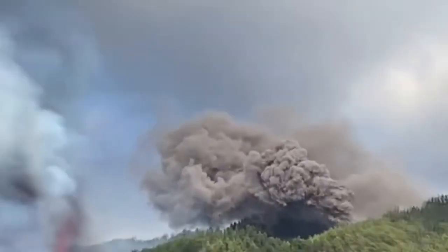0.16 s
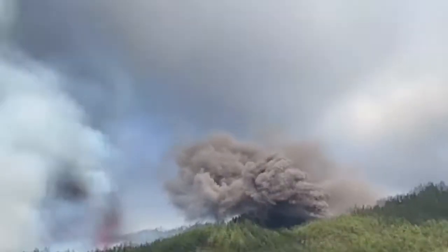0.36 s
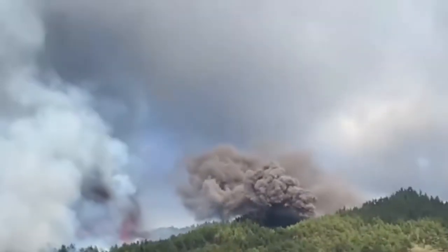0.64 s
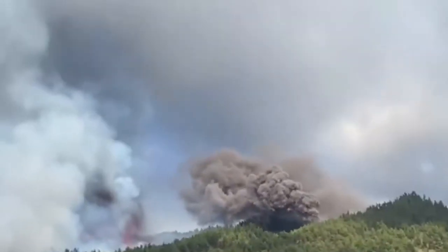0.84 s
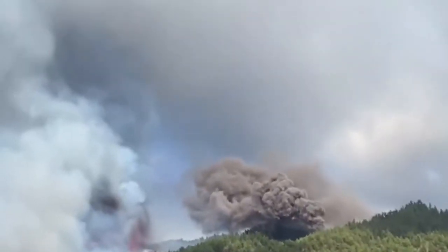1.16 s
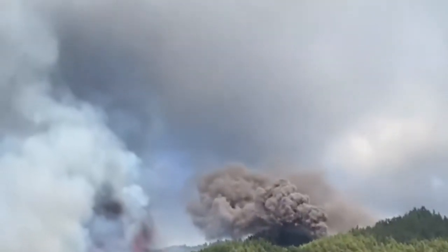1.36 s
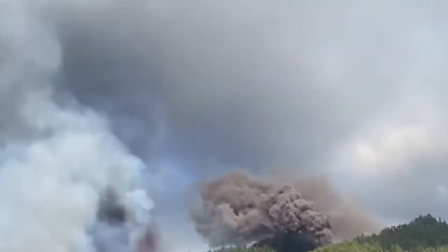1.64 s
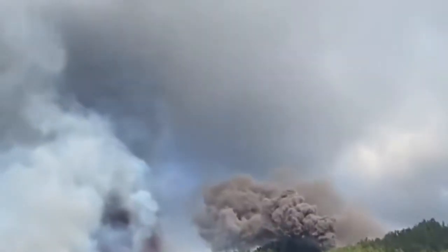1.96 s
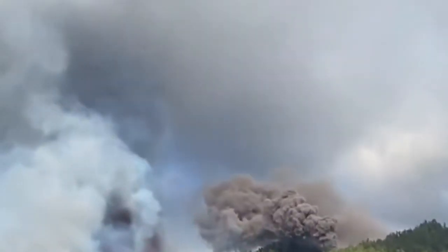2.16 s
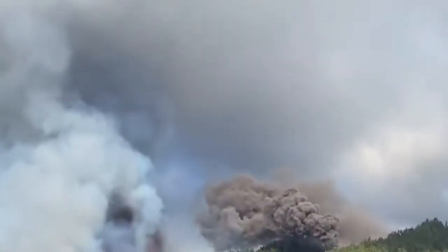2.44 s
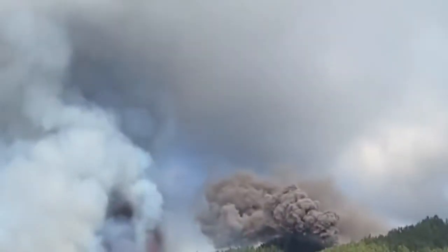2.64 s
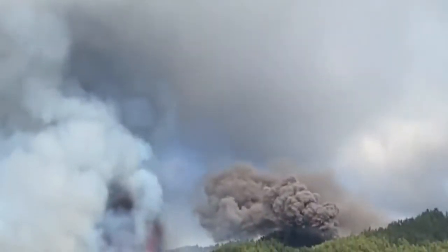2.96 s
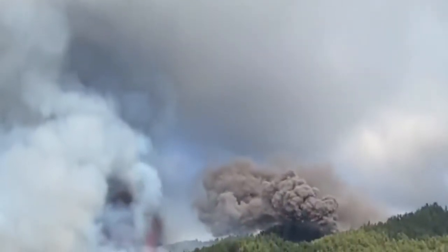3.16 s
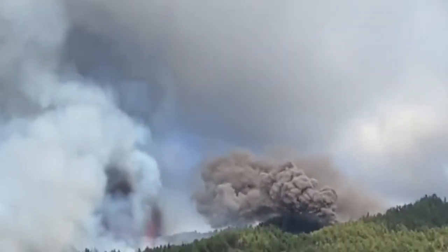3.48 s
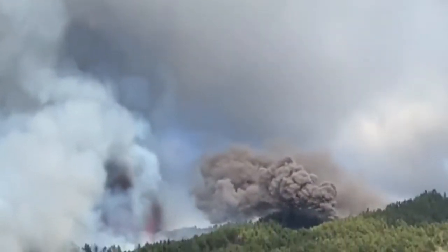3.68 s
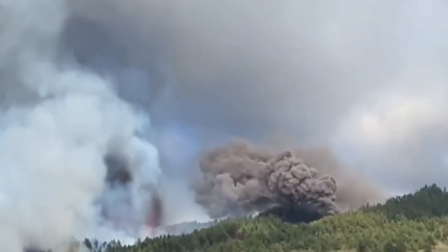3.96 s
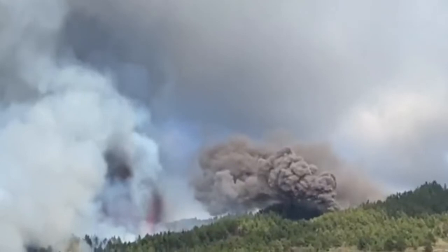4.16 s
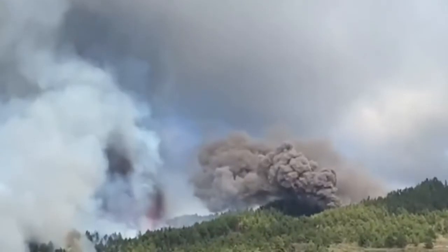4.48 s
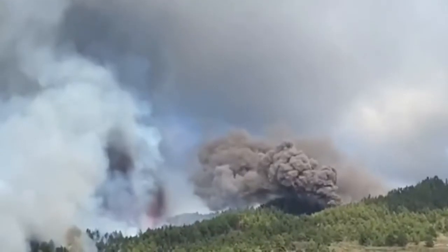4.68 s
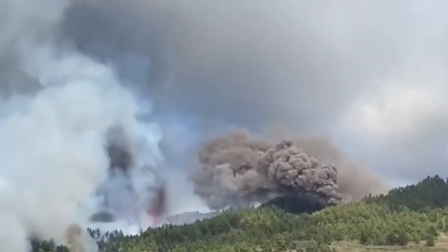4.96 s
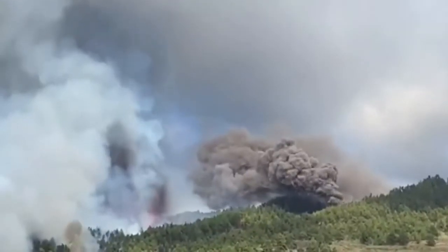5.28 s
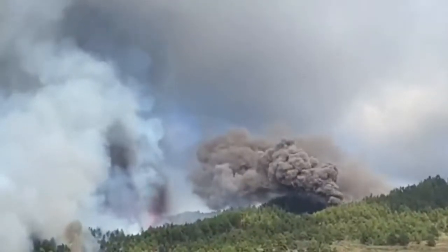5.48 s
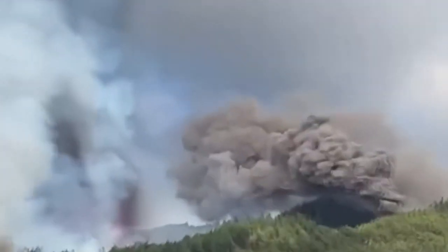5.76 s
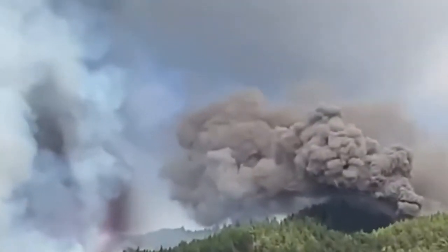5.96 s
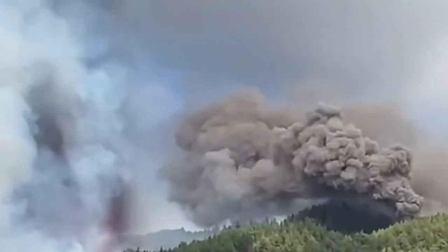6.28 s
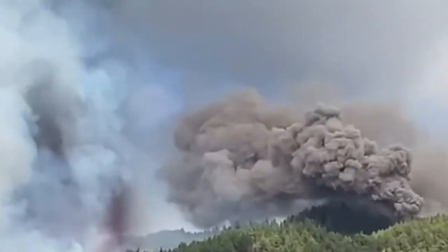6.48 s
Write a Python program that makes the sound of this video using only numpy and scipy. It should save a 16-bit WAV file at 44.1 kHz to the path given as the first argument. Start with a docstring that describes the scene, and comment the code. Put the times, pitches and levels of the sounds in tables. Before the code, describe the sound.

A volcano erupts some kilometres off, heard from a wooded hillside. A steady, loud, low rumble throbs quickly and swells slowly, with muffled roar and a little rasp on top. Dull low thuds crowd the middle, and a strong surge near three seconds brings brief pressure cracks. Small birds chirp faintly, high and falling, with a short woodland echo. Faint hiss and regular ticking lie underneath. The sound is almost centred, with dull treble.

```python
"""A gas jet roars in slow surges: a volcano erupting some kilometres off, heard from a wooded hillside.
Bands of shaped noise make its roar, rasp and deep throbbing rumble; short low tones make the thuds,
and brief pressure pulses the shocks. Small birds, near and far, give thin, mostly falling chirps: bent
whistles with a scattered echo. Pulsed noise ticks faintly and evenly through a steady noise hiss,
and one tiny burst of bright noise clicks."""
import sys
import numpy as np
from scipy import signal
from scipy.fft import rfft, irfft
from scipy.io import wavfile

SR = 44100
rng = np.random.default_rng(int(sys.argv[2]) if len(sys.argv) > 2 else 0)


def wrap_up_sound(samples):
    """Save the sound to the file named by the first command line argument, as 16-bit audio."""
    columns = np.atleast_2d(samples).T
    # keep every value between -1 and 1, then stretch to whole-number steps
    tamed = np.clip(columns, -1, 1)
    steps = np.round(tamed * 32767).astype(np.int16)
    wavfile.write(sys.argv[1], SR, steps)


N = 291942  # length in samples
TIME = np.arange(N) / SR  # s
FREQS = np.fft.rfftfreq(N, 1 / SR)  # Hz

# heaviest thuds from the vent: middle t/s, level before trim/dB, pitch f/Hz, length/s
THUD_EVENTS = [(0.225, -17.5, 158, .06), (0.279, -22, 50, .09), (0.434, -16, 86.4, .06),
               (0.858, -17, 105.3, .045), (1.043, -14, 89.7, .065), (1.364, -19.5, 86, .06),
               (1.623, -16, 94.5, .055), (1.797, -15.5, 123.6, 0.0804), (1.883, -15, 86.7, .06),
               (1.916, -16.5, 154, .05), (2.015, -14.5, 90.5, .075), (2.08, -22, 50, .08),
               (2.101, -10.5, 83, .04), (2.103, -15, 142, 0.049), (2.22, -17, 99.2, .055),
               (2.234, -20, 152, .06), (2.285, -16.5, 104.7, .06), (2.492, -17, 101, .06),
               (2.812, -18, 85.8, .06), (2.908, -17.5, 86.6, .07), (2.92, -14.5, 144, .06),
               (3.074, -21, 160, .055), (3.162, -13.5, 76, .085), (3.253, -17.5, 144.3, .06),
               (3.319, -15, 121.6, .06), (3.334, -18, 52, .08), (3.352, -15, 89, .06),
               (3.474, -14.5, 104.6, .045), (3.557, -13, 108.4, .045), (3.647, -13, 72.2, .1),
               (3.781, -14, 84.5, 0.049), (3.946, -11.5, 90.8, .05), (4.09, -16, 91.5, .055),
               (4.164, -17, 88, .05), (5.06, -16, 88, 0.06), (5.25, -19.5, 72.3, .07),
               (5.545, -20, 164, .055), (5.551, -19, 50, .08), (5.657, -16, 70, .06), (5.82, -14, 90, .06),
               (5.93, -15, 75.8, .06), (6.025, -14.5, 80.7, .08), (6.161, -14.5, 77.6, .07),
               (6.362, -16, 88.6, .06), (6.409, -20, 146.4, .05), (6.477, -19, 81.7, 0.052),
               (6.551, -18.5, 84.6, .05)]


def gain_of(db):
    """Decibels to amplitude."""
    return 10 ** (np.asarray(db) / 20)


def evened(x):
    """Scales to an rms of one."""
    return x / np.sqrt(np.mean(x ** 2) + 1e-20)


def read(points):
    """A table over frequency, joined by straight lines on a log axis."""
    hz, value = np.transpose(points)
    return np.interp(np.log(FREQS + 1), np.log(hz + 1), value)


def over_time(points):
    """A table over time, joined by straight lines: one curve for each level column."""
    s, *levels = np.transpose(points)
    return [np.interp(TIME, s, level) for level in levels]


def add(mix, s, sound):
    """Mixes a sound in from time s, or from the very start if s is negative."""
    part = mix[max(round(s * SR), 0):][:len(sound)]
    part += sound[:len(part)]


def noise(gain):
    """Noise of unit rms, its spectrum shaped by the given gain at each frequency."""
    return evened(irfft(rfft(rng.standard_normal(N)) * gain, N))


def below(hz, order=8):
    """Gain of a low-pass, steep at the usual order."""
    return 1 / np.sqrt(1 + (FREQS / hz) ** (2 * order))


def above(hz, order=8):
    """Gain of the matching high-pass."""
    return np.sqrt(1 - below(hz, order=order) ** 2)


def steadied(x, seconds):
    """Takes the slow drift out of a noise and keeps its quick throb."""
    window = signal.windows.hann(int(seconds * SR))
    total = signal.fftconvolve(x ** 2, window, "same")
    weight = signal.fftconvolve(np.ones(N), window, "same")
    return x / np.sqrt(np.maximum(total / weight, 1e-9))


def eruption(deep_db=-3.5, rumble_db=-0.47, churn_db=0.6):
    """Large eddies rumble and throb, smaller ones roar and rasp; turbulence makes the jet churn."""
    # surges of the gas jet: t/s, roar level/dB, rasp level/dB, both before the churn
    surges = [(0, -27, -33.5), (0.2, -24, -32.5), (0.42, -25, -31.5), (0.65, -26.5, -34), (0.77, -23, -33),
              (0.88, -25, -32.5), (.96, -23.5, -33), (1.03, -21, -26.5), (1.1, -22, -30), (1.19, -23, -32),
              (1.29, -26, -32), (1.43, -25.5, -32), (1.68, -26, -33.5), (1.85, -23, -31), (2.0, -24.5, -32),
              (2.24, -24, -30), (2.36, -24, -32), (2.52, -24.5, -33), (2.72, -23, -31.5),
              (2.88, -22.5, -32), (2.99, -19, -28.5), (3.13, -22.5, -30), (3.24, -20.5, -30),
              (3.4, -25.5, -33), (3.52, -23, -30.5), (3.68, -24.5, -33), (3.85, -24, -31),
              (4.12, -25, -33.5), (4.27, -27, -34.5), (4.65, -26.5, -35), (5.0, -27, -32.5),
              (5.2, -25.5, -31.5), (5.45, -25, -31), (5.72, -25, -30.5), (5.86, -21.5, -28.5),
              (6.1, -24, -31), (6.24, -25.5, -32), (6.62, -23.5, -29.5)]
    # slow swells of the rumble: t/s, deepest bass level/dB, upper bass level/dB, both before trim
    swells = [(0, -30.5, -24), (0.3, -25.5, -23), (0.6, -26, -23), (1.0, -27, -24.5), (1.5, -25.5, -23),
              (2.0, -26, -23), (2.5, -27.5, -23), (2.9, -27.5, -20.5), (3.35, -25, -24), (3.75, -27.5, -25),
              (4.1, -24.5, -22), (4.5, -30, -26.5), (4.9, -28, -25), (5.35, -29, -23.5),
              (5.68, -21.5, -24.5), (6.05, -25, -20.5), (6.62, -23.5, -24)]
    # relative spectra of rumble, roar and rasp: f/Hz, level/dB
    rumble_colour = [(20, -21), (30, -16.5), (40, -10), (51, -1.5), (60, -1.5), (70, 0.5), (82, -0.8),
                     (97, 0.3), (114, 0.7), (130, -2.5), (143, -2.5), (165, -6.5), (220, -5)]
    roar_colour = [(76, -30), (130, 0), (190, -4.7), (236, -9), (290, -7.5), (364, -7.7), (560, -10.5),
                   (1300, -18), (1690, -49.5), (2860, -120)]
    rasp_colour = [(410, -24.5), (700, -0.5), (1810, -10), (2310, -17.5), (2530, -22.5), (3070, -27),
                   (3990, -43.5), (6750, -120)]
    deep_hz = 63.5  # where the deepest bass gives way to the upper bass

    roar_level, rasp_level = over_time(surges)
    deep_level, upper_level = over_time(swells)
    churn = churn_db * noise(below(13))
    bass = gain_of(read(rumble_colour))

    deep = steadied(noise(bass * below(deep_hz)), .5)
    deep = deep * gain_of(deep_level + deep_db)
    rumble = steadied(noise(bass * above(deep_hz) * below(170.0)), 0.2)
    rumble = rumble * gain_of(upper_level + throb() + rumble_db) * between_thuds()
    roar = steadied(noise(gain_of(read(roar_colour)) * above(167.4) * below(847)), 0.53)
    roar = roar * gain_of(roar_level + churn)
    rasp = noise(gain_of(read(rasp_colour)) * above(890) * below(3500, order=12))
    rasp = rasp * gain_of(rasp_level + churn)
    return deep + rumble + roar + rasp


def throb(throbs_per_s=9.8, depth_db=0.8, wander=.2):
    """The vent puffs at a loose rate: a swing of level in dB whose rate wanders."""
    turns = np.cumsum(throbs_per_s * (1 + wander * noise(below(4)))) / SR
    return depth_db * np.sin(2 * np.pi * (turns + rng.random()))


def between_thuds(thud_share=0.42):
    """Gain of the loose rumble: one between thuds, lower by up to thud_share while a thud passes."""
    passing = np.zeros(N)
    for s, _, _, length in THUD_EVENTS:
        add(passing, s - length / 2, signal.windows.hann(int(length * SR)))
    return 1 - thud_share * np.minimum(passing, 1)


def thuds(trim_db=-0.5):
    """Bursts of gas arrive as a few rounded cycles of low pressure."""
    out = np.zeros(N)
    for (s, db, hz, length), phase in zip(THUD_EVENTS, rng.random(len(THUD_EVENTS))):
        t = np.arange(int(length * SR)) / SR
        push = np.sin(2 * np.pi * (hz * t + phase)) * signal.windows.hann(len(t))
        add(out, s - length / 2, gain_of(db + trim_db) * push)
    return out


def shocks(width=0.00046, suction=0.0016):
    """A shock from the jet, rounded by distance: a short push with a shallow suction around it."""
    # sharp shocks around the biggest surge: middle t/s, level of the push before suction/dB
    shock_events = [(2.992, -9.5), (3.003, -8), (3.022, -15), (3.108, -17)]
    t = np.arange(-SR // 100, SR // 100) / SR
    push = np.exp(-(t / width) ** 2)
    pull = width / suction * np.exp(-(t / suction) ** 2)  # same area as the push
    out = np.zeros(N)
    for s, db in shock_events:
        add(out, s + t[0], gain_of(db) * (push - pull))
    return out


def birds(waver=.008, flicker_db=2.0, rough_hz=230, octave_db=-35, echo_t60=0.26, echo_db=2):
    """Bent whistles swell and fade, rough ones flutter; trees scatter an echo, more so for far birds."""
    # the nearer chirps: start t/s, length/s, start f/Hz, middle f/Hz, end f/Hz,
    # loudest point [0-1 of the length], roughness [0-1], level/dB
    near_chirps = [ (0.008, .027, 5850, 5550, 4950, 0.7, .35, -51),
                   (0.026, .06, 4900, 3950, 3280, .42, 0.35, -49.5),
                   (0.111, 0.085, 3170, 3150, 3030, 0.5, 0.3, -46),
                   (0.322, .027, 4850, 4450, 4050, .4, .2, -59),
                   (0.803, .05, 5100, 5350, 5450, .5, .15, -65),
                   (0.895, 0.1, 4750, 4350, 4000, .3, 0.3, -61), (.99, .05, 5800, 5350, 4800, .3, .3, -64),
                   (1.252, .03, 6000, 5000, 4100, .5, .4, -60), (1.483, .04, 5400, 4500, 3900, .4, .3, -61),
                   (1.65, 0.028, 5900, 4900, 4000, .5, .3, -60),
                   (2.01, .05, 5400, 5650, 5750, .5, .15, -63),
                   (2.108, .06, 5950, 5400, 4670, .5, .45, -61),
                   (2.11, 0.084, 3990, 3980, 3940, .6, .45, -56),
                   (2.469, 0.055, 5900, 5000, 4050, 0.85, .4, -57.5),
                   (2.585, 0.028, 5150, 4650, 4150, .6, .15, -54.5),
                   (2.62, .05, 4800, 4550, 4400, .5, .6, -62),
                   (2.708, 0.064, 5800, 4600, 3450, .72, .2, -52.5),
                   (2.768, .05, 5200, 4850, 4450, 0.4, .25, -63),
                   (2.871, 0.039, 4750, 4350, 3800, .4, .5, -56.5),
                   (2.958, 0.032, 5900, 5420, 5000, 0.75, .2, -55),
                   (2.983, 0.046, 4700, 4180, 3420, .35, .15, -48.5),
                   (2.995, 0.079, 5700, 5150, 4400, 0.3, .3, -63),
                   (3.051, .035, 5300, 4700, 4100, .5, .6, -59),
                   (4.048, .04, 5070, 4750, 4400, .4, .6, -61),
                   (4.168, .045, 5400, 4900, 4200, .6, .2, -59), (4.26, .03, 5900, 5200, 4500, .5, .3, -63),
                   (4.325, .04, 4850, 4550, 4200, .4, .3, -62),
                   (4.575, 0.032, 4950, 4600, 4350, .6, .4, -60),
                   (4.712, .016, 5400, 4950, 4650, .5, .15, -52),
                   (4.723, 0.068, 4900, 4680, 4200, .2, .45, -54.5),
                   (4.786, 0.036, 5800, 4800, 4000, 0.2, .6, -57),
                   (5.08, .039, 5830, 4800, 3950, .5, .25, -59), (5.16, .03, 6150, 5400, 4600, .4, .3, -60),
                   (5.307, .032, 6050, 5000, 3850, 0.4, .3, -56.5),
                   (5.398, .034, 5850, 4800, 4000, .5, .2, -56.5),
                   (5.458, .023, 6100, 5300, 4600, .5, .3, -59),
                   (5.51, .05, 4000, 4280, 4480, .6, .2, -60.5),
                   (5.603, 0.09, 6280, 4900, 4080, 0.5, .5, -52),
                   (5.676, .022, 3950, 4000, 3950, .6, .15, -50),
                   (5.777, .028, 6240, 5500, 4400, .7, .5, -59),
                   (5.815, .075, 3900, 4100, 4400, .4, .4, -58),
                   (5.832, 0.09, 5400, 5150, 4700, 0.74, .75, -56.5),
                   (5.897, .02, 6380, 6480, 6380, .5, .1, -58), (5.895, .05, 5500, 6070, 6700, .3, .6, -63),
                   (5.89, .1, 4870, 4250, 3900, 0.6, .5, -56),
                   (6.364, 0.029, 5650, 4630, 4400, 0.3, 0.2, -42.5),
                   (6.393, .027, 4350, 3950, 3450, .55, .2, -50),
                   (6.462, .022, 4900, 4500, 4250, .4, .3, -59),
                   (6.546, .018, 6550, 6200, 5750, .7, .5, -55),
                   (6.562, 0.016, 5700, 4500, 3850, 0.2, .3, -43),
                   (6.572, .035, 4900, 4200, 4000, .5, .8, -49),
                   (6.604, 0.019, 4770, 5220, 5100, .5, 0.2, -39.5)]
    trill_hz, trill_depth = 170.6, .035  # pitch warble: rate; share of the pitch at full roughness
    taper_db = 11  # fade per whole length away from the loudest point
    # echo share of a chirp at near_db, before echo_db; dB more of it for each dB fainter
    near_db, echo_share, echo_growth = -50, 0.3, .2

    direct, scattered = np.zeros(N), np.zeros(N)
    wobble, flicker = noise(below(110, order=2)), noise(below(110))
    # complex noise moved down to centre on 0 Hz
    flutter = signal.hilbert(noise(below(2 * rough_hz, order=3)))
    flutter = flutter * np.exp(-2j * np.pi * rough_hz * TIME) / np.sqrt(2)

    for s, length, *pitches, loudest, rough, db in [*near_chirps, *far_chirps()]:
        u = np.linspace(0, 1, int(length * SR))  # progress through the chirp
        here = (int(s * SR) + np.arange(len(u))) % N
        bend = np.polyfit([0, .5, 1], np.log(pitches), 2)
        hz = np.exp(np.polyval(bend, u)) * (1 + waver * wobble[here])
        trill = np.sin(2 * np.pi * trill_hz * TIME[here] + wobble[here])
        warble = 1 + rough * trill_depth * trill
        turn = np.exp(2j * np.pi * np.cumsum(hz * warble) / SR)
        voice = turn + gain_of(octave_db) * turn ** 2
        tone = (voice * (1 - rough + rough * flutter[here])).real
        strength_db = flicker_db * flicker[here] - taper_db * abs(u - loudest)
        strength = signal.windows.tukey(len(u), .25) * gain_of(strength_db)
        whistle = gain_of(db) * evened(strength * tone) / np.sqrt(2)  # rms of a sine peaking at db
        add(direct, s, whistle)
        add(scattered, s, echo_share * gain_of(echo_growth * (near_db - db)) * whistle)

    t = TIME[:SR // 2]
    trees = rng.standard_normal(len(t)) * gain_of(-60 * t / echo_t60)
    echo = signal.fftconvolve(scattered, trees / np.linalg.norm(trees))[:N]
    return direct + gain_of(echo_db) * echo


def far_chirps(count=64, level_db=-66.5, spread_db=7, shortest=.025, longest=0.065):
    """The flock calls at uneven intervals from deeper in the trees; columns as in near_chirps."""
    # start pitch range of the distant flock: lowest f/Hz, highest f/Hz
    flock_range = (4800, 5970)
    fall = .72  # end pitch over start pitch
    when, slow, high, near, loudest, rough = rng.random((count, 6)).T
    start_s = (np.arange(count) + when) / count * N / SR
    length = shortest + (longest - shortest) * slow
    start_hz = np.interp(high, [0, 1], flock_range)
    db = level_db + spread_db * (near - .5)
    return np.transpose([start_s, length, start_hz, np.sqrt(fall) * start_hz, fall * start_hz,
                         loudest, rough / 2, db])


def ticking(ticks_per_s=12.5, offbeat_db=-4, first=0.064, width=.008):
    """The treble ticks softly and evenly: pulsed noise with a weaker tick between the beats."""
    # level of the ticking before its unevenness: t/s, level/dB
    tick_level = [(0, -67.5), (1.0, -62.5), (1.6, -66.5), (2.3, -64.5), (3.0, -68), (4.3, -67.5),
                  (5.0, -62.5), (5.7, -66.5), (6.62, -66)]
    # relative spectrum: f/Hz, level/dB
    colour = [(3000, -18.0), (5000, -7.0), (6400, 5.5), (7100, -8.5), (8300, -25.5), (9500, -25.5),
              (10500, -18.5), (12000, -22)]
    beats = (TIME - first) * ticks_per_s
    apart = abs((beats + .5) % 1 - .5) / ticks_per_s  # s to the nearest beat
    on_beat = np.exp(-(apart / width) ** 2)
    off_beat = np.exp(-((apart - .5 / ticks_per_s) / width) ** 2)
    pulse = on_beat + gain_of(offbeat_db) * off_beat
    uneven_db = 1.3 * noise(below(6))
    level, = over_time(tick_level)
    return noise(gain_of(read(colour)) * above(3000)) * pulse * gain_of(level + uneven_db)


def snap(boost_db=6.0, click_t60=.015, tail_t60=.07):
    """A small bright click: a burst of noise that dies at once, with a weaker, slower tail."""
    # one tiny dry click: start t/s, level before boost/dB
    s, db = (2.357, -57.5)
    # relative spectrum: f/Hz, level/dB
    colour = [(3500, -24), (5200, -7.0), (7200, 7), (8200, -6), (9000, -21), (11000, -15)]
    age = np.maximum(TIME - s, 0)
    fade = gain_of(-60 * age / click_t60) + gain_of(-6 - 60 * age / tail_t60)
    bright = noise(gain_of(read(colour)) * above(3500))
    return gain_of(db + boost_db) * bright * fade * (TIME >= s)


def hiss(level_db=-60, flicker_db=2.0):
    """Faint open-air hiss: treble noise whose level flickers."""
    # relative spectrum: f/Hz, level/dB
    hiss_colour = [(2500, -9), (3500, 5.5), (4300, 0.5), (5200, -3), (6300, -8), (7200, -14.5), (8300, -28),
                   (9400, -34.5), (10500, -18.5), (11700, -25)]
    flicker = flicker_db * noise(below(24))
    return noise(gain_of(read(hiss_colour)) * above(2500)) * gain_of(level_db + flicker)


def scene():
    """All lies ahead; some roar returns diffusely from the slopes, dulled by the longer path."""
    # gain of the diffuse roar in the side signal: f/Hz, level/dB
    side_gain = [(60, -21.5), (85, -28), (120, -24), (170, -24.5), (240, -22), (330, -26), (470, -21.5),
                 (660, -20.5), (940, -23), (1320, -20), (1860, -18.5), (2620, -26.5)]
    # lean of the sound ahead, left minus right: f/Hz, level/dB
    left_lean = [(60, -0.5), (100, -0.5), (180, -1.0), (300, -0.5), (520, -0.5), (890, -0.5), (1530, -1.0),
                 (2620, -0.5)]
    mid = rfft(eruption() + thuds() + shocks() + birds() + ticking() + snap() + hiss())
    side = rfft(eruption()) * gain_of(read(side_gain)) * below(2800)
    lean = gain_of(read(left_lean) / 2)
    return irfft(np.array([mid * lean + side, mid / lean - side]), N)


def record(dry, low_cut_hz=30, edge_hz=11900):
    """The microphone loses the deepest bass; then soft ends and the band limit at edge_hz."""
    low_cut = signal.butter(4, low_cut_hz, "highpass", fs=SR, output="sos")
    thinned = signal.sosfilt(low_cut, dry)
    ends = signal.windows.tukey(N, .001)
    band_limit = signal.firwin(511, edge_hz, window=("kaiser", 9), fs=SR)
    return signal.oaconvolve(thinned * ends, band_limit[None], "same")


dry = scene()
out = record(dry)
wrap_up_sound(out)
```